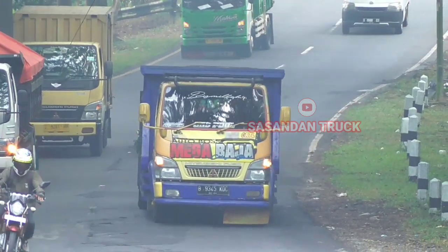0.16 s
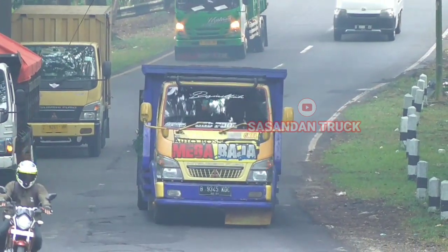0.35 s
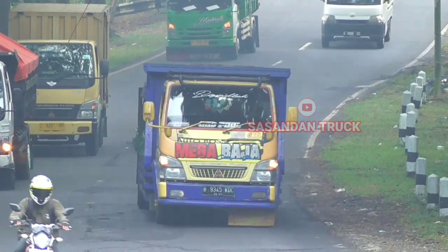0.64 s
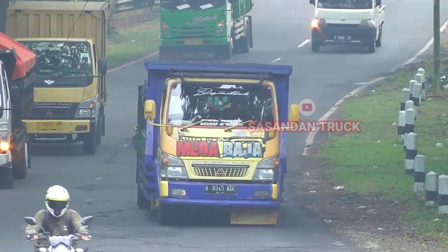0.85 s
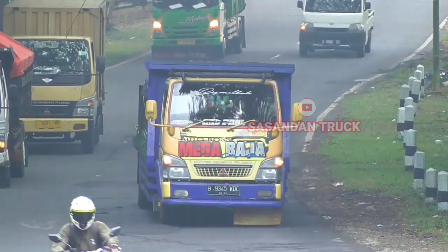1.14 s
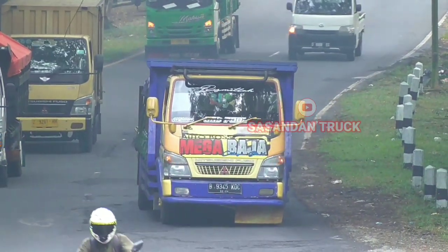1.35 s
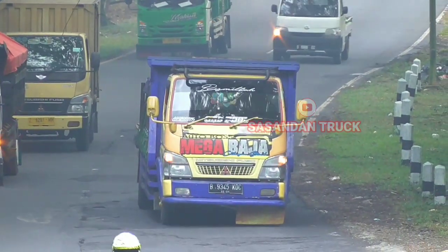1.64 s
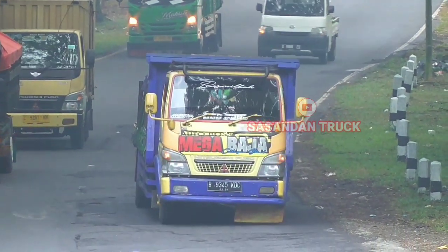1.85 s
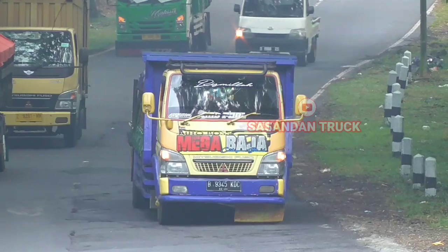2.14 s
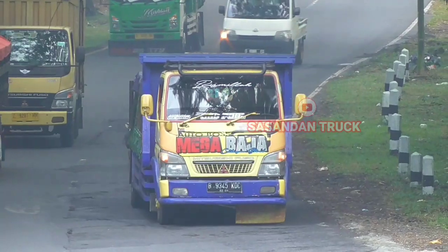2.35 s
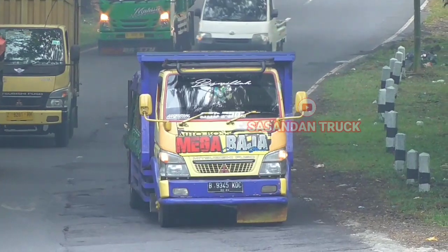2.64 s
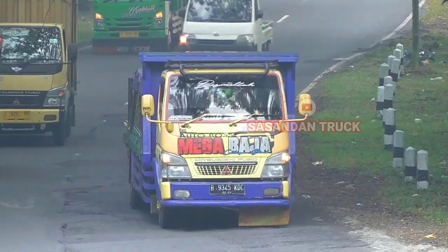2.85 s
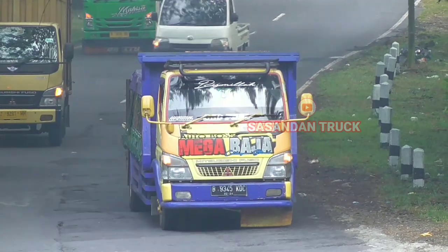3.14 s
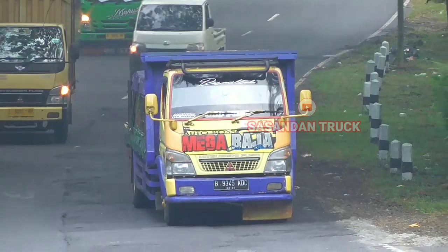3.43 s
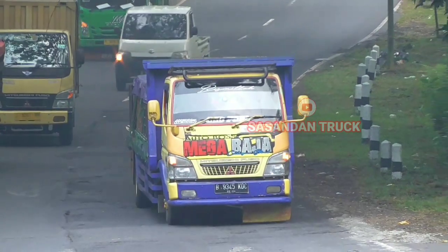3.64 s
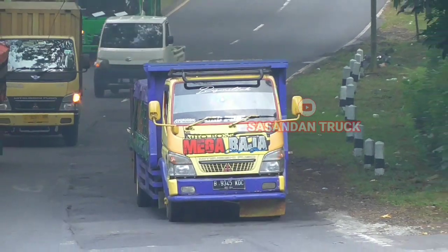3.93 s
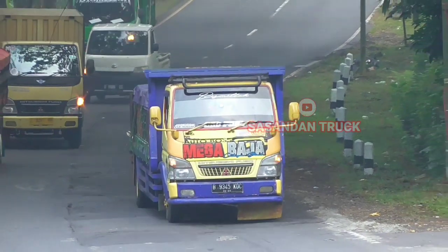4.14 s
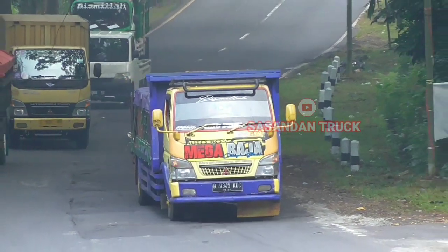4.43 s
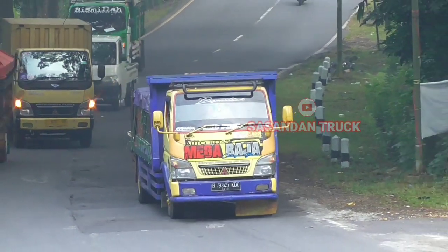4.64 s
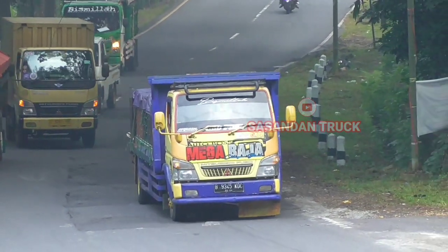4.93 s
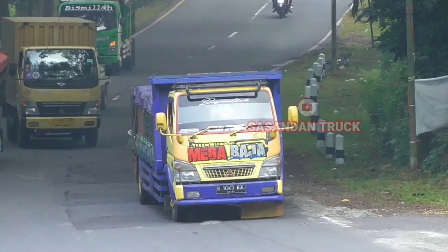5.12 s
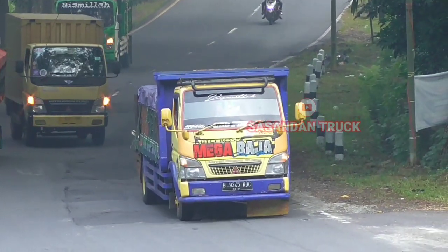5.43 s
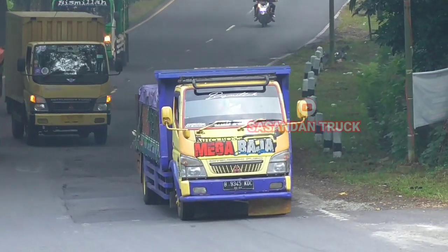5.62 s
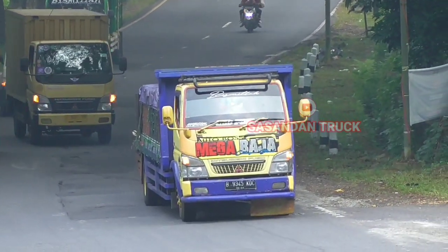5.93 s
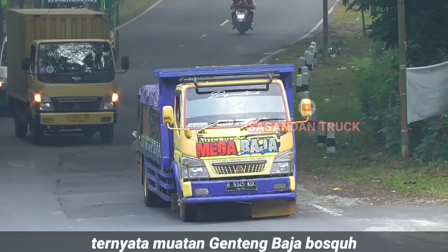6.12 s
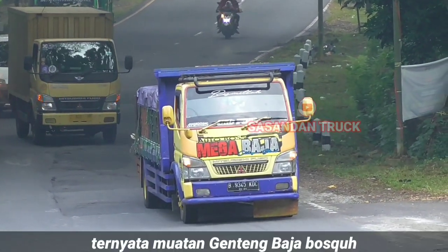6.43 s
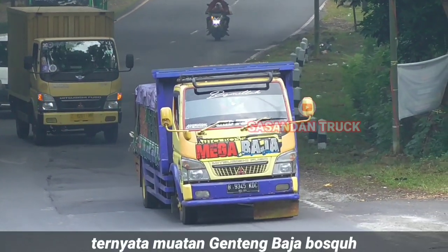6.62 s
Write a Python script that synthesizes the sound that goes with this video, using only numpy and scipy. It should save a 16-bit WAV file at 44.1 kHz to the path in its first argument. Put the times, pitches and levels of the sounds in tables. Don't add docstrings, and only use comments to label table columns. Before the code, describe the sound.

Outdoors beside a tree-lined uphill road, a loaded diesel truck approaches in low gear, its buzzing drone slowly rising in pitch and loudness with metallic clatter and fan hiss. Halfway, the clutch thumps, the note slides down, and a deeper, louder growl pulls past close on the left. Other trucks rumble behind; cicadas and a very high cricket hiss faintly. Stereo roadside microphone.

```python
import sys
import numpy as np
from scipy import signal
from scipy.fft import rfft, irfft, next_fast_len
from scipy.io import wavfile
from scipy.ndimage import uniform_filter1d

SR = 44100
rng = np.random.default_rng(int(sys.argv[2]) if len(sys.argv) > 2 else 0)


def invert_db(x):
    u = np.asarray(x, float) / 20
    return 10 ** u


def pcm_store(signal):
    levels = np.round(np.clip(np.atleast_2d(signal), -1, 1) * 32767)
    wavfile.write(sys.argv[1], SR, levels.astype(np.int16).T)


N = 298557
T = np.arange(N) / SR

# (time [s], share of the higher gear [0-1], unevenness of the firings [0-1], throttle [dB])
GEAR = [
    (0, 0, .17, 0),
    (2.5, 0, .1, 0),
    (3.43, 0, .1, 0),
    (3.46, .2, .25, -12),
    (3.95, .6, .22, -10),
    (4.2, 1, .09, 0),
    (6.77, 1, .11, 0),
]


def curves(table):
    s, *columns = np.transpose(table)
    return [np.interp(T, s, c) for c in columns]


def along(points, hz):
    f, v = np.transpose(points)
    return np.interp(np.log(np.maximum(hz, 1)), np.log(f), v)


def unit(x):
    return x / np.sqrt(np.mean(np.abs(x) ** 2))


def walk(rate):
    k = max(int(SR / rate), 2)
    steps = np.repeat(rng.standard_normal(N // k + 1), k)
    smooth = uniform_filter1d(uniform_filter1d(steps, k), k)
    return unit(smooth[:N])


def band(x, low_hz, high_hz):
    return signal.sosfilt(signal.butter(2, [low_hz, high_hz], "band", fs=SR, output="sos"), x)


def noise(spectrum, flicker_db, rate):
    # (frequency [Hz], coherence [0-1])
    coherence = [(30, 0.73), (150, 0.86), (500, 0.83), (1200, 0.89), (3500, 0.7575), (6300, 0.31),
                 (10000, 0.59), (15000, 0.356)]
    size = next_fast_len(N)
    hz = np.arange(size // 2 + 1) * SR / size
    coloured = rfft(rng.standard_normal((3, size))) * invert_db(along(spectrum, hz))
    like = np.clip(along(coherence, hz), 0, 1)
    coloured *= np.sqrt([like, 1 - like, 1 - like])
    out = np.zeros((3, N))
    for centre in np.arange(np.log2(spectrum[0][0]), np.log2(spectrum[-1][0]) + 1):
        window = np.cos(np.pi / 2 * np.clip(np.log2(hz + 1) - centre, -1, 1)) ** 2
        out += irfft(coloured * window, size)[:, :N] * invert_db(flicker_db * walk(rate))
    return out / np.sqrt(np.mean((out[0] + out[1]) ** 2))


def place(trio, lead, pan_db, direct):
    samples = np.arange(N)
    left = np.interp(samples + .5 * lead, samples, trio[0])
    right = np.interp(samples - .5 * lead, samples, trio[0])
    scatter = np.sqrt(1 + 2 * (1 - direct))
    pair = np.sqrt(direct) * np.array([left, right]) + scatter * trio[1:]
    return pair * invert_db(np.array([pan_db, -pan_db]) / 2)


def layer_level(alongside_db, per_near_db, high_gear_db, per_throttle_db):
    # (time [s], level [dB])
    nearness = [(0, -15.5), (1.4, -12.5), (2.05, -9), (2.35, -8.5), (2.9, -7), (3.02, -4.5), (3.2, -5),
                (3.38, -2.5), (3.55, -7.5), (3.8, -5), (3.97, -6.5), (4.15, -2), (4.47, 0.5), (5.2, -1.5),
                (5.7, -2.5), (6.05, -4), (6.2, -2.5), (6.77, -7.5)]
    near_db, = curves(nearness)
    high, _, throttle_db = curves(GEAR)
    return alongside_db + per_near_db * near_db + high_gear_db * high + per_throttle_db * throttle_db


def pipe_booms(exhaust_db, view):
    # (overtone 2 [dB], 3 [dB], 4 [dB], 5 [dB], 6 [dB])
    pipe_balance = [
        (0.4, -14, -5.5, -16, -16),
        (-2, 0, -6, -27, -28),
        (0.1, -9, -18, -35, -32),
        (1, -5.5, -6.5, -15, -21),
        (-5, -3.5, -0.2, -9.5, -16.5),
        (-10, 1, -12.5, -7, -18),
        (-3, -0.1, -16.5, -10, -22),
        (-3, -2, -2, -6, -2.5),
    ]
    view_points = [0, 1, 1.5, 2, 3, 4, 5, 6]
    note = np.array([np.interp(view, view_points, c) for c in np.transpose(pipe_balance)])
    return exhaust_db + note - 10 * np.log10(np.sum(invert_db(2 * note), axis=0))


def engine(clatter_db, rattle_db, bass_lead, pan_db, direct):
    # (time [s], firing rate [Hz], exhaust boom [dB], view of the pipe [0 far ahead - 6 from behind])
    climb = [(0, 67.93, -31, 0.0), (1.36, 72.73, -27.5, 0.2), (1.9, 74.1, -25.5, 0.2),
             (2.3, 75.62, -26.5, 0.5), (2.76, 77.08, -23.5, 0.98), (3.25, 77.07, -22.5, 1.0),
             (3.445, 77.2, -18.5, 1.5), (3.458, 73.7, -27, 2.0), (3.81, 62.3, -24, 3),
             (3.95, 58.2, -30, 3.0), (4.15, 56.7, -22.5, 3.0), (4.33, 56.2, -16.5, 4.0),
             (5.1, 54.8, -15.5, 5.0), (5.4, 54.3, -16.5, 6), (5.77, 53.4, -18.5, 6),
             (5.98, 53.53, -15.5, 5.8), (6.42, 53.3, -22, 6.0), (6.77, 53.85, -22, 6.0)]
    # (multiple of the firing rate, level [dB], used only from 7 up)
    low_gear = [(1, -25), (2, 0), (3, -2), (4, -4), (5, -19), (6, -19), (7, -19.5), (8, -26), (9, -19),
                (10, -20), (11, -21), (12, -18), (13, -20), (14, -16), (15, -26), (16, -31), (17, -22.5),
                (18, -27), (19, -35), (20, -26), (21, -28), (22, -25), (23, -43), (24, -37), (25, -28),
                (26, -32.5), (27, -30), (28, -21)]
    # (multiple of the firing rate, level [dB], used only from 7 up)
    high_gear = [(1, -34), (2, -4), (3, 0), (4, -7), (5, -7), (6, -8), (7, -28), (8, -28), (9, -29),
                 (10, -28), (11, -29.5), (12, -32), (13, -27), (14, -23.5), (15, -30), (16, -35.5),
                 (17, -31), (18, -35), (19, -36), (20, -32), (21, -30.5), (22, -45), (23, -45), (24, -35.5),
                 (25, -42), (26, -33.5), (27, -31.5), (28, -34)]
    # (time [s], phase [rad])
    road_echo = [
        (0, .8),
        (4.3, .6),
        (5.0, .6),
        (5.45, 1.3),
        (5.6, 1.3),
        (5.95, .15),
        (6.25, .5),
        (6.77, .9),
    ]
    silencer_hz = 1723.7
    hz, exhaust_db, view = curves(climb)
    boom_db = pipe_booms(exhaust_db, view)
    gear, uneven, throttle_db = curves(GEAR)
    turn = 2 * np.pi * np.cumsum(hz * (1 + 0.001965 * walk(12))) / SR
    echo, = curves(road_echo)
    side, out = np.array([[.5], [-.5]]), np.zeros((2, N))
    for (k, low_db), (_, high_db) in zip(low_gear, high_gear):
        if k == 1:
            db = np.maximum(-70 + 40 * bass_lead, -57) + 0.787 * walk(4.0595)
        elif k <= 6:
            db = boom_db[int(k) - 2] + 10.5 * uneven * walk(8)
        else:
            db = (1 - gear) * (low_db + 9.0) + gear * (high_db + 16) + throttle_db
            db += np.where(k * hz < 1250, clatter_db, rattle_db + 4.5)
            db += 2.2 * walk(4) - 2.6 - np.maximum(k * hz - silencer_hz, 0) / 12
        roughness = uneven if 2 <= k <= 6 else .18 + .017 * k
        smear = 1 + roughness * (walk(25) + 1j * walk(25))
        scatter = 0 if k < 7 else 3.7 * (1 - direct) * walk(6)
        apart = side * (bass_lead * min(1, 7 / k) + scatter)
        path = echo * (min(k, 7) - 4) ** 2 + .7 * max(k - 7, 0) ** 2 + .3 * walk(2)
        tone = np.sqrt(2) * invert_db(db) * smear * np.exp(1j * (k * turn + path))
        pan = invert_db(side * pan_db * np.clip((k - 3) / 6, -.1, 1.))
        out += (tone * np.exp(1j * apart)).real * pan
    return out, turn, gear


def block_clatter(clatter_db, rattle_db, turn):
    # (frequency [Hz], density [dB per Hz])
    block = [(400, -13), (600, -27), (720, 1.5), (850, 3), (1100, -0.5), (1250, -3.5), (1500, -13),
             (2000, -11.5), (2700, -23), (4000, -30.5)]
    # (frequency [Hz], density [dB per Hz])
    loose_parts = [(1000, -33), (1250, 0.5), (1480, -2), (1600, -1.5), (1750, -26)]
    gate = 1 + 0.12455 * np.cos(turn) + 0.0979 * np.cos(2 * turn)
    clatter = noise(block, 0.22, 9) * invert_db(clatter_db - 1.0)
    rattle = noise(loose_parts, 1.7, 9) * invert_db(rattle_db - 2.5)
    return (clatter + rattle) * gate


def gear_whine(hiss_db, turn, gear):
    # (multiple of the firing rate, level against the hiss [dB])
    teeth = [
        (42.5, -13),
        (46, -16),
        (60, -15.5),
    ]
    out = np.zeros(N)
    for k, db in teeth:
        level = invert_db(db + np.minimum(hiss_db, -45) + 3 * walk(4) - 20 * gear)
        out += level * (walk(45) * np.cos(k * turn) + walk(45) * np.sin(k * turn))
    return out


def fan_and_tyres(hiss_db, top_db, gear):
    # (frequency [Hz], density [dB per Hz])
    hiss_ahead = [(1200, -23), (2000, -0.5), (2700, -3.5), (3300, 1), (4500, -1.5), (6100, -8.5),
                  (7000, -5), (9000, -3.5), (11500, -7.5), (13500, -18), (14250, -15.5), (14450, -55)]
    # (frequency [Hz], density [dB per Hz])
    hiss_alongside = [(1200, -5), (2000, 0), (2700, -1.5), (3600, -1.5), (5000, -3), (6100, -5),
                      (6900, -1.5), (8500, -3.5), (11000, -6), (13500, -14.5), (14500, -16), (15500, -26)]
    air = np.sqrt(1 - gear) * noise(hiss_ahead, 0.65, 14)
    air += np.sqrt(gear) * noise(hiss_alongside, 0.46, 14)
    air *= invert_db(.45 * walk(14))
    low = signal.sosfilt(signal.butter(2, 7500, fs=SR, output="sos"), air)
    return low * invert_db(hiss_db + 4.5) + (air - low) * invert_db(top_db + 10.0)


def squeaks():
    # (time [s], centre [Hz], width [Hz], level [dB], length [s])
    rings = [(4.507, 1830, 740, -29.5, 0.0077), (0.64, 3250, 300, -56, .14), (1.9, 3350, 250, -52, 0.092),
             (4.6, 7000, 504, -45, .05), (3.05, 3800, 300, -44, 0.072), (3.0, 1050, 56, -32, 0.035),
             (3.65, 10450, 250.1, -39, 0.01251), (5.4, 8160, 700, -39.5, 0.04896),
             (4.44, 8400, 900.2, -39, 0.008081), (5.16, 760, 56, -31.5, 0.052),
             (5.08, 1490, 34, -37.5, 0.14), (5.249, 1100, 59, -31, 0.053), (5.46, 770, 41, -32, 0.053),
             (5.95, 1420, 54.5, -37.5, 0.12), (6.4, 770, 44, -37.5, 0.053)]
    out = np.zeros(N)
    for s, hz, width, db, length in rings:
        rasp = band(rng.standard_normal(N), hz - width / 2, hz + width / 2)
        out += unit(rasp) * invert_db(db) * np.exp(-.5 * ((T - s) / length) ** 2)
    return out


def clutch_thump():
    # (time [s], centre [Hz], level [dB], decay [s])
    s, hz, db, decay = (3.452, 200, -26, .05)
    thump = unit(band(rng.standard_normal(N), hz / 1.5, 1.6 * hz))
    return thump * invert_db(db) * (T > s) * np.exp(-np.abs(T - s) / decay)


def queue_behind():
    # (frequency [Hz], density [dB per Hz])
    rumble_colour = [(70, -31), (95, -17), (120, -0.5), (200, 1), (300, -1), (380, -9.5), (500, -36)]
    # (frequency [Hz], density [dB per Hz])
    drone_colour = [(280, -8), (380, -5), (500, 0), (640, 0), (800, -16.5)]
    # (frequency [Hz], density [dB per Hz])
    ground_colour = [(20, -15.5), (37, -15.5), (45, -2), (60, -6), (85, -4.5), (110, -12)]
    # (frequency [Hz], level [dB])
    idlers = [
        (62, -57),
        (84, -55),
        (105, -53),
        (122, -42.5),
    ]
    # (time [s], length [s], level [dB])
    rev_s, rev_length, rev_db = (3.72, .22, 4)
    surge_db = rev_db * np.exp(-.5 * ((T - rev_s) / rev_length) ** 2)
    drone_db = -39.5 + surge_db + 5.5 * np.maximum(T - 4.93, 0)
    far = noise(rumble_colour, 1.1, 4.8713) * invert_db(-34 + surge_db)
    far += noise(drone_colour, 1.8, 6.1053) * invert_db(drone_db - 2.0)
    far += noise(ground_colour, 1.115, 4.9) * invert_db(-48)
    hum = np.zeros(N)
    for hz, db in idlers:
        hum += invert_db(db + 2.5 * walk(5.9)) * np.cos(2 * np.pi * hz * T + 1.6 * walk(3.06))
    return far[0] + far[1:] + hum


def cicadas():
    centre_hz, width_hz = 7920, 840
    a, b = band(rng.standard_normal((2, N)), centre_hz - width_hz / 2, centre_hz + width_hz / 2)
    return unit(np.array([a, 0.49 * a + 0.26 * b])) * invert_db(-46.5 + 1.4 * walk(9))


def cricket():
    # (time [s], frequency [Hz], level [dB])
    phrase = [
        (0, 13800, -52),
        (.4, 13920, -53.5),
        (.7, 14010, -48),
        (1.3, 13840, -51),
        (1.91, 13750, -52),
    ]
    start_s, phrase_s, wing_hz = .75, 1.92, 286
    s, hz, db = np.transpose(phrase)
    phrase_time = (T - start_s) % phrase_s
    hz = np.interp(phrase_time, s, hz)
    db = np.interp(phrase_time, s, db)
    beat = 1 + .65 * np.cos(2 * np.pi * wing_hz * T + .8 * walk(10))
    drift = np.array([walk(4), walk(4.14)])
    whistle = np.cos(2 * np.pi * np.cumsum(hz) / SR + 0.98 * drift) * invert_db(db + [[-2.2], [2.2]])
    return beat * whistle * invert_db(1.5 * walk(16) + drift[::-1])


def far_crickets():
    # (frequency [Hz], density [dB per Hz])
    haze_colour = [(12800, -25), (13400, -4), (13900, -0.5), (14250, -3), (14400, -40.5)]
    haze = noise(haze_colour, .8, 12) * invert_db(-60.5)
    return haze[0] + haze[1:]


def scene():
    # (time [s], left lead [samples], bass phase lead [rad], left minus right [dB], direct share [0-1])
    bearing = [
        (0, 1, 0.0882, -1, 0.91),
        (3.5, -0.1, 0.1312, 0, 0.95),
        (4.3, 0.3, 0.22945, 1.5, 0.98),
        (4.8, 2, 0.34, 4, 0.76),
        (5.3, 3.5, 0.46, 7.5, 0.55),
        (5.8, 2.5, 0.53, 4, 0.43),
        (6.77, 2, 0.63, 2.5, 0.57),
    ]
    lead, bass_lead, pan_db, direct = curves(bearing)
    clatter_db = layer_level(-28.5, 0.55, -0.86, -.15)
    rattle_db = layer_level(-31, 0.95, -2.5, 0.1)
    hiss_db = layer_level(-35, 1.06, 0.04, -0.16)
    top_db = layer_level(-38.5, 1.44, -0.03, -0.14)
    tones, turn, gear = engine(clatter_db, rattle_db, bass_lead, pan_db, direct)
    clatter = place(block_clatter(clatter_db, rattle_db, turn), lead, pan_db, direct)
    whine = gear_whine(hiss_db, turn, gear)
    air = place(fan_and_tyres(hiss_db, top_db, gear), lead, 0.37 * pan_db, direct)
    truck = tones + clatter + whine + air + squeaks() + clutch_thump()
    return truck + queue_behind() + cicadas() + cricket() + far_crickets()


def band_limit(x):
    return signal.sosfilt(signal.butter(12, 15150, fs=SR, output="sos"), x)


def record(dry):
    left = signal.sosfilt(signal.butter(1, 53.6, "high", fs=SR, output="sos"), dry[0])
    pair = signal.sosfilt(signal.butter(6, 15050, fs=SR, output="sos"), [left, dry[1]])
    return band_limit(pair)


dry = scene()
out = record(dry)
pcm_store(out)
```